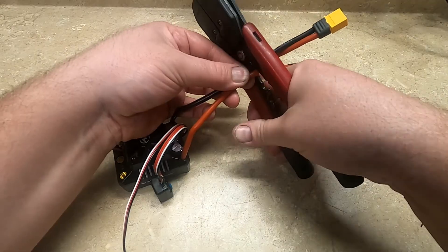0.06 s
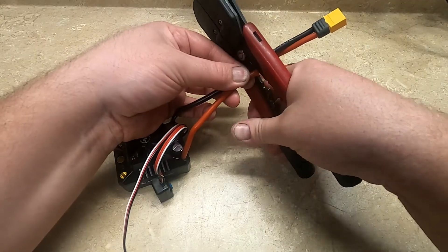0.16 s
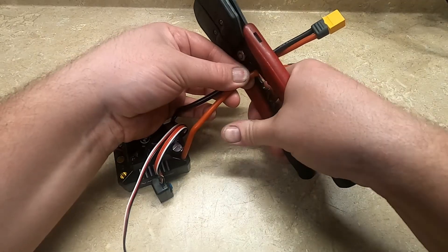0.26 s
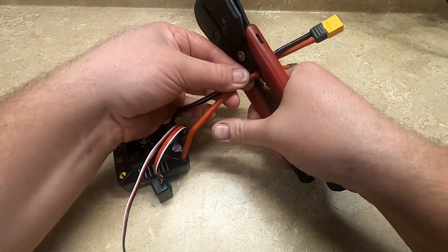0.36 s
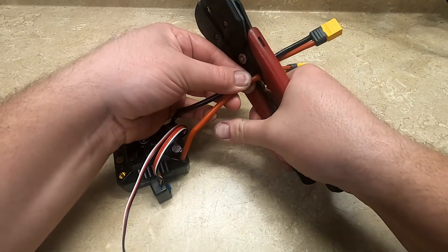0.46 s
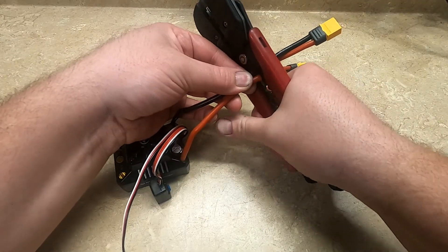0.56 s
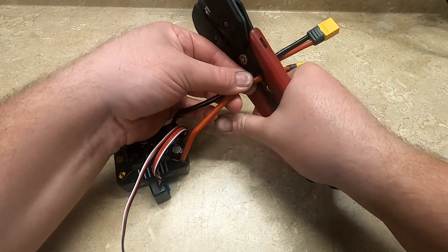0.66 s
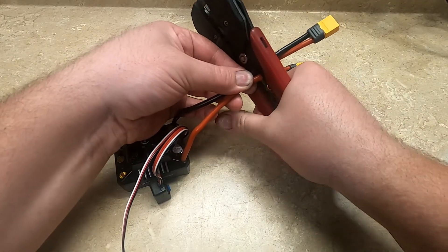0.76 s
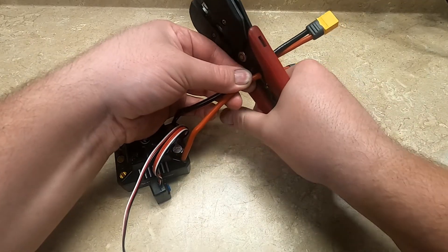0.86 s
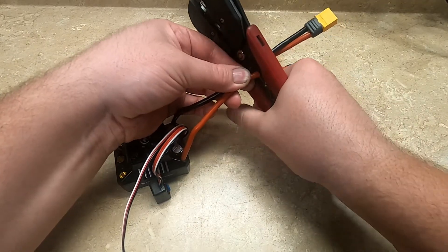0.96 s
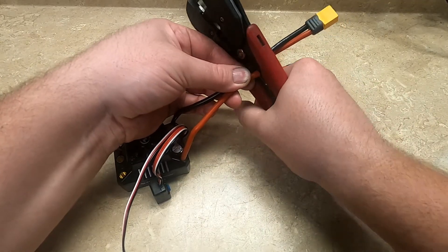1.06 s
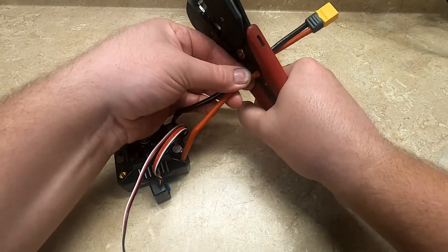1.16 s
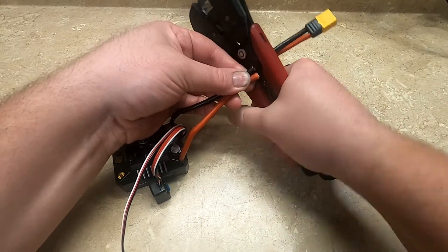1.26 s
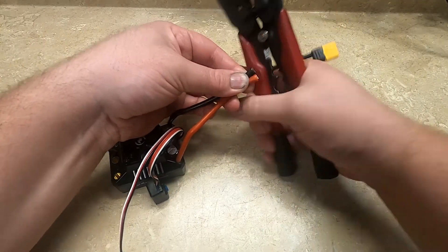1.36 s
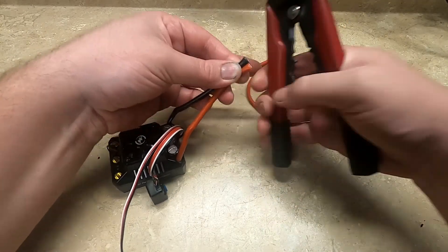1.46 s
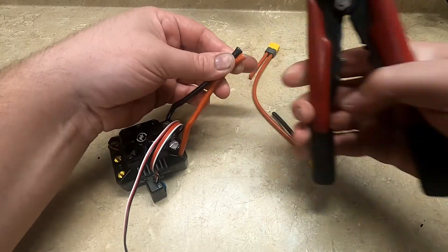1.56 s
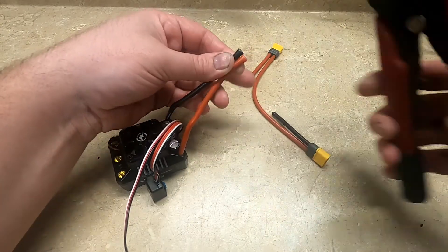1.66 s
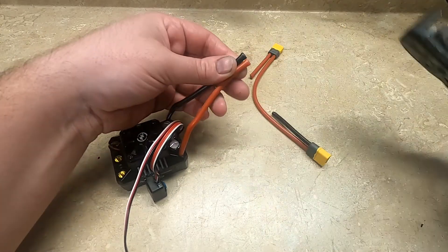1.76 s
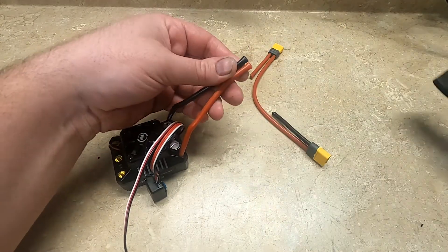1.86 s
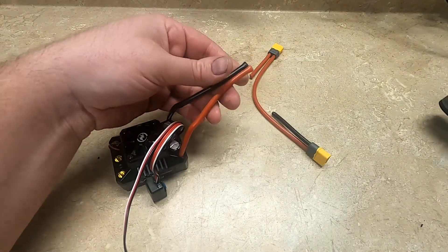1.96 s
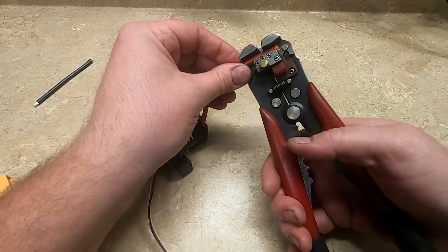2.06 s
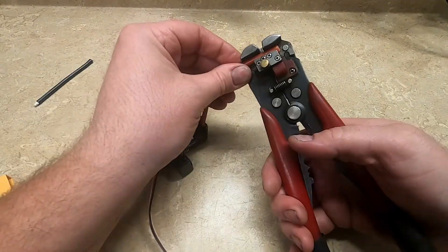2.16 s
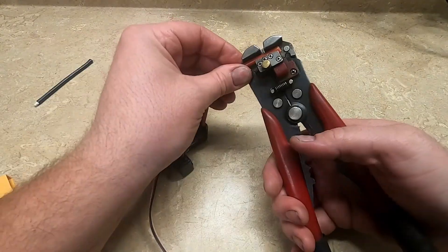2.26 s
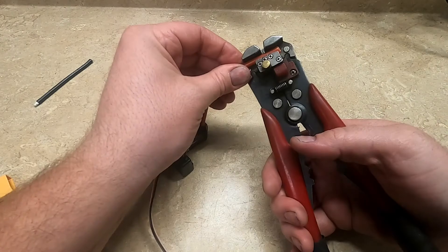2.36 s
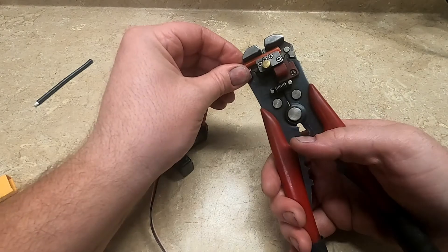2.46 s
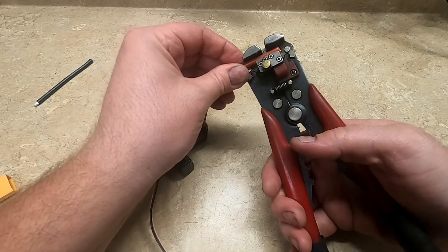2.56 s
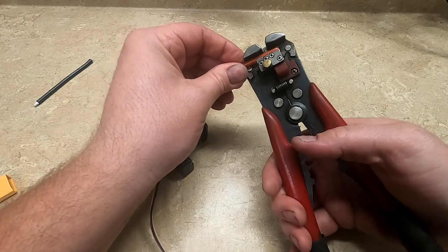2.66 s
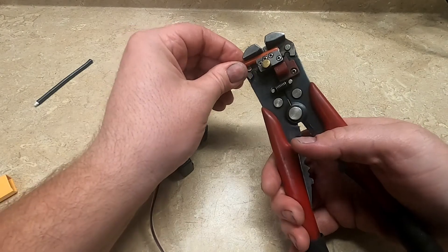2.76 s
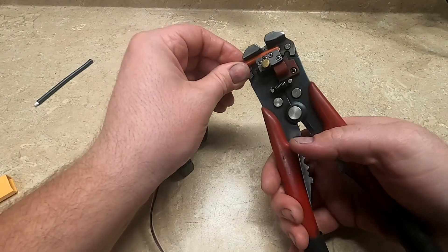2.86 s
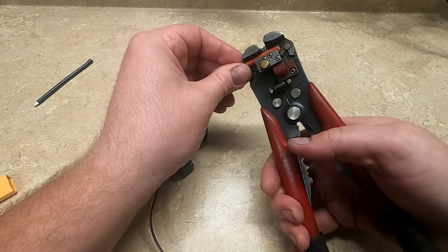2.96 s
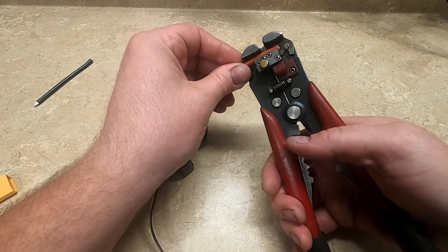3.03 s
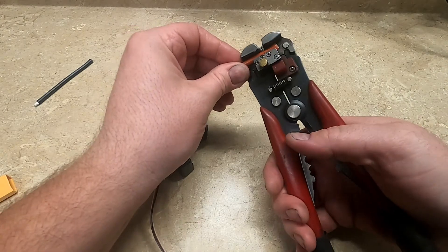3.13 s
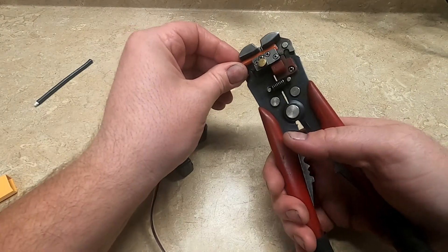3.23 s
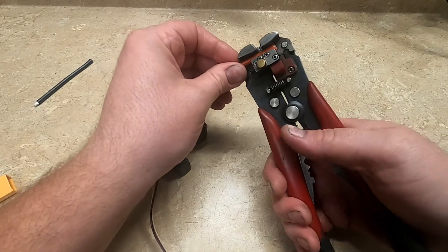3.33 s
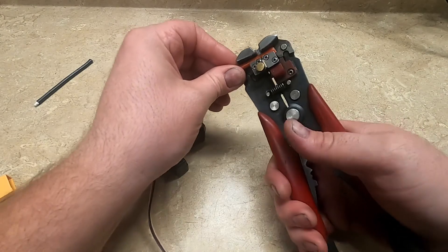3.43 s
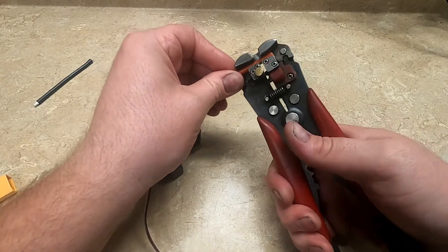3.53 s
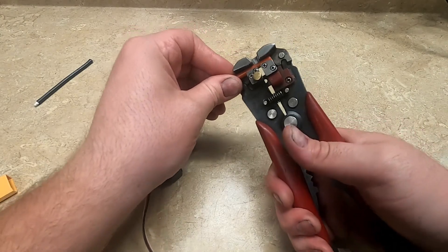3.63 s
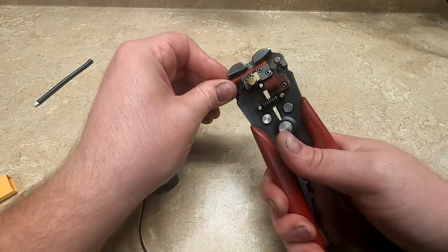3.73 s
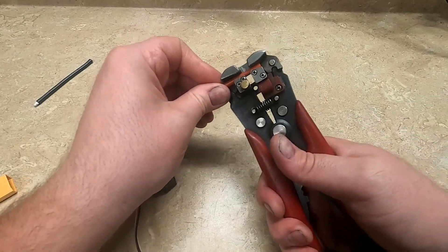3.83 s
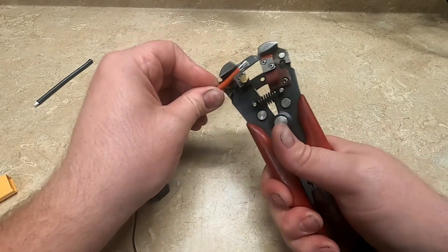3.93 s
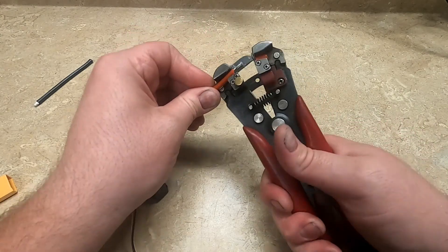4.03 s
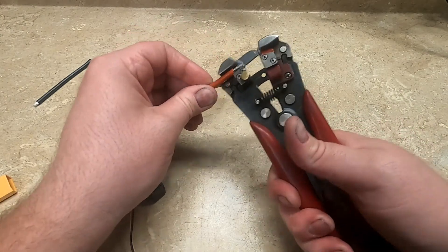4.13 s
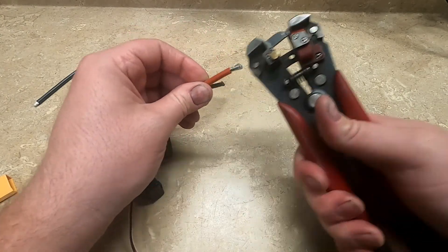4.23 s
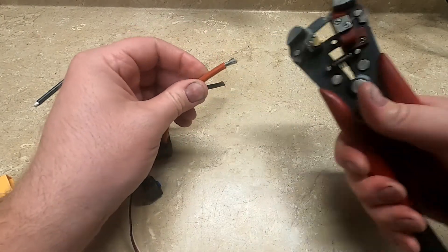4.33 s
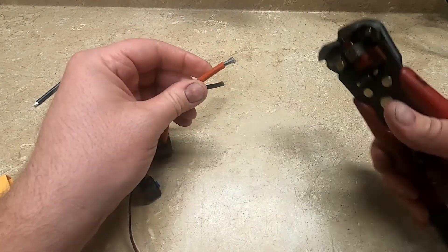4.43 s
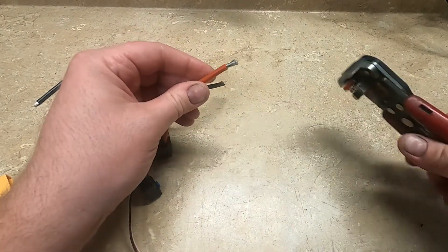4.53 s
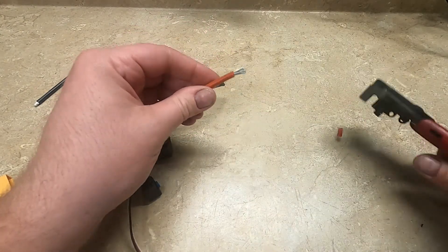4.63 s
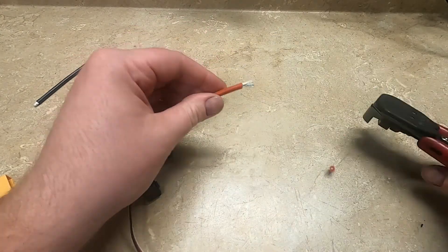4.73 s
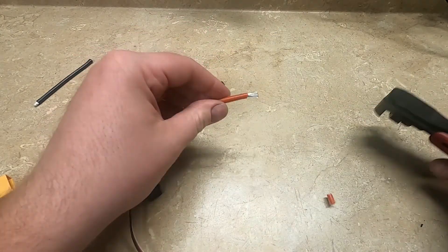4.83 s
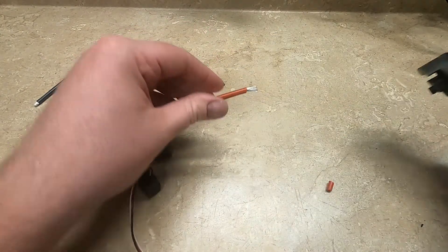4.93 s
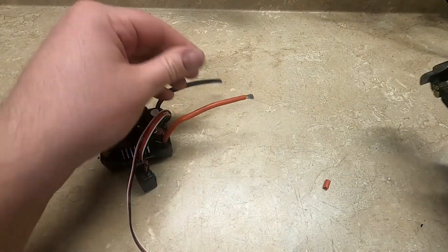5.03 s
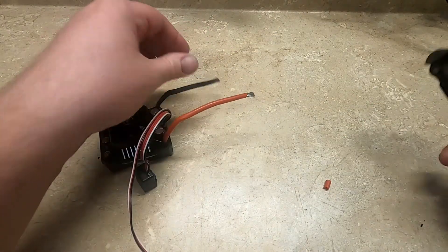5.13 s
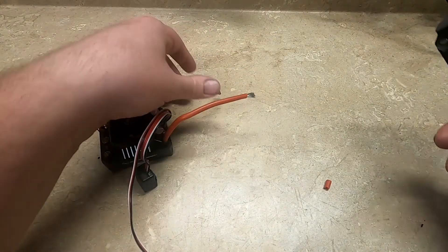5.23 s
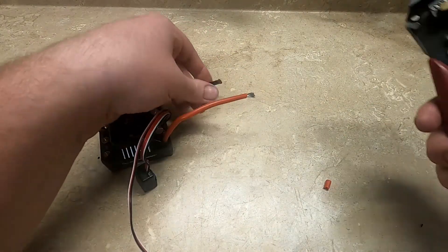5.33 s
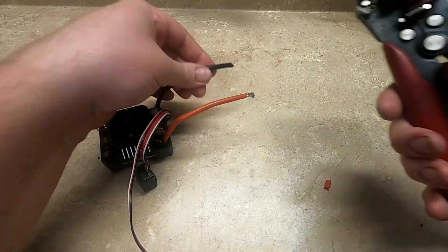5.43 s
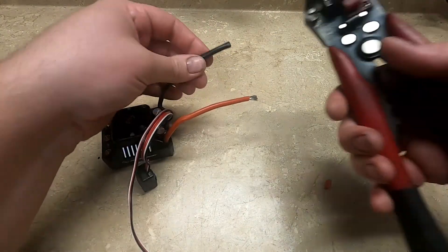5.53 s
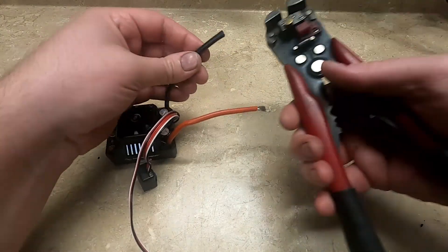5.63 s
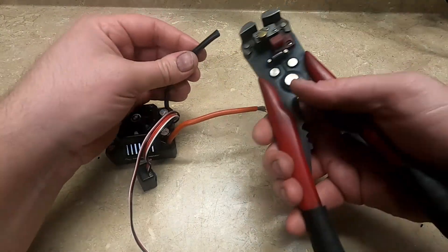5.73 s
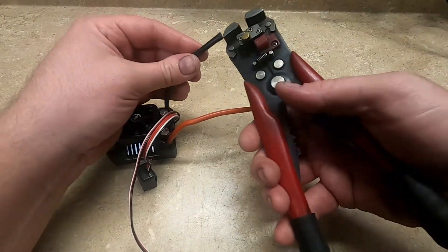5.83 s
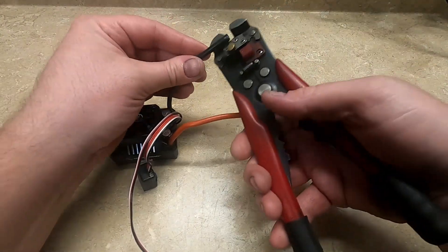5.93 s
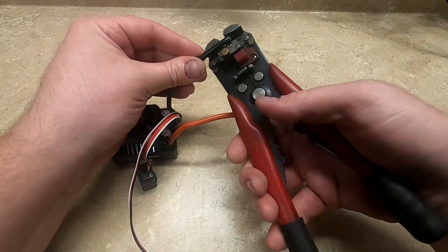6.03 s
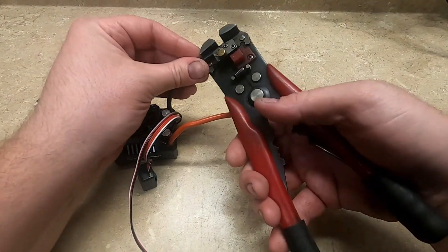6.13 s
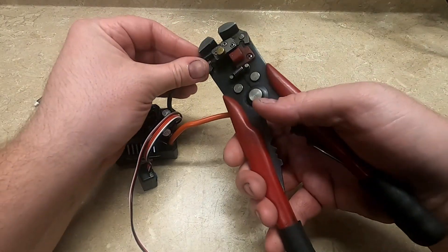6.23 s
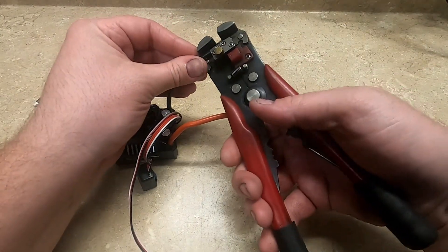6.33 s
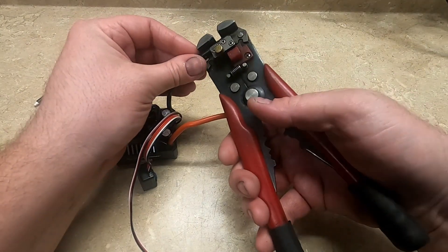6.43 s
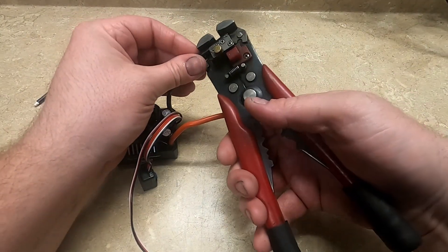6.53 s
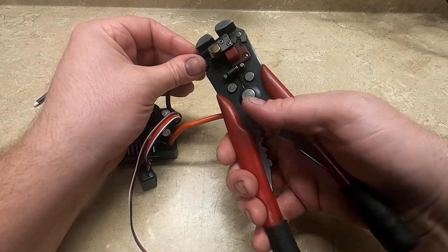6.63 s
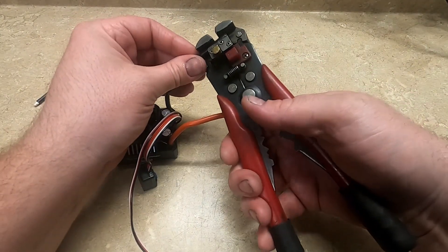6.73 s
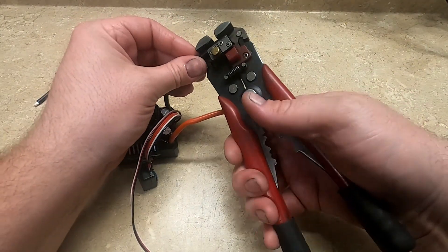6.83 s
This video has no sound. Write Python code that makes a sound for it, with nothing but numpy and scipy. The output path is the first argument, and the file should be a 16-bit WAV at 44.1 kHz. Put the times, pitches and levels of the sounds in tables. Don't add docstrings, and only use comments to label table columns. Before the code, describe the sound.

Wire cutting and stripping by hand, recorded close with a light indoor echo. Sparse metallic ticks and soft rustle lead to a hard snap, clattering jaws and a booming bump on the counter. A quick fade brings faint lining-up ticks, a low scraping pull, bright spring snaps, and finally light part knocks, a dull dragging thud and quiet handling.

```python
import sys
import numpy as np
from scipy import signal
from scipy.fft import rfft, irfft, next_fast_len
from scipy.io import wavfile
from scipy.ndimage import uniform_filter1d

SR = 44100
rng = np.random.default_rng(int(sys.argv[2]) if len(sys.argv) > 2 else 0)


def int16_out(signal):
    q = np.round(np.clip(np.atleast_2d(signal).T, -1, 1) * 32767)
    wavfile.write(sys.argv[1], SR, q.astype(np.int16))


def ratio(d):
    e = np.asarray(d, float) / 20
    return 10 ** e


N = 303849
LEAD_S = .02
RATTLE_RISE_S = .008

# f/Hz, width/Hz, level/dB
COUNTER_MODES = [(176.2, 8.9, -6.5), (261.3, 16, -5.5), (354.9, 53, 5), (462, 90, -9), (728, 91, -15),
                 (1017, 47, -20), (1226.3, 280, -18.5), (1446, 45, -21.5), (1824, 220, -22.5),
                 (2200, 940, -30.5), (3040, 1400, -42)]
# f/Hz, width/Hz, level/dB
MOUNT_MODES = [(45.4, 15, -4.5), (69.56, 39, -16), (98, 55, -1)]


def evened(x):
    return x / np.sqrt(np.mean(x ** 2) + 1e-20)


def read(points, hz):
    f, value = np.transpose(points)
    return np.interp(np.log(hz + 1), np.log(f + 1), value, left=value[0], right=value[-1])


def colour(x, points):
    size = next_fast_len(x.shape[-1])
    gain = ratio(read(points, np.fft.rfftfreq(size, 1 / SR)))
    return irfft(rfft(x, size) * gain, size)[..., :x.shape[-1]]


def add(mix, s, sound):
    part = mix[..., round(s * SR):][..., :sound.shape[-1]]
    part += sound[..., :part.shape[-1]]


def ring(modes, centre_hz=1000, narrow_db=0, tilt_db=0, detune=1, size=8192):
    hz, width, db = np.transpose(modes)[:, :, None]
    t = np.arange(size) / SR
    octaves = np.log2(hz / centre_hz)
    db = db - np.minimum(narrow_db * octaves ** 2, 22.) + tilt_db * octaves
    decay = np.exp(-np.pi * width * t)
    swell = 1 - decay ** 3
    return (ratio(db) * np.sqrt(width) * decay * swell * np.sin(2 * np.pi * hz * detune * t)).sum(0)


def chatter(noise, rise, fall, blow=0):
    t = np.arange(len(noise)) / SR - LEAD_S
    shape = np.exp(np.minimum(t / max(rise, 1e-4), -t / max(fall, 1e-4)))
    settling = ratio(-30) * np.exp(-t / .014) * (1 - t / t[-1]) * (t > 0) * noise
    first = blow * np.exp(-(t / 0.00016) ** 2)
    return np.tanh(noise ** 3 / 4) * shape + settling + first


def slips(per_s, spread_db, smooth):
    size = ratio(spread_db * np.minimum(rng.exponential(1, N), 4))
    size = size * (rng.random(N) < per_s / SR)
    return evened(size * rng.standard_normal(N)) + smooth * rng.standard_normal(N)


def gestures(s, rise, fall, db, hold=0):
    t = np.arange(0, N + 64, 64)[:, None] / SR
    before = (s - t) / np.maximum(rise, .003)
    after = (t - s - hold) / np.maximum(fall, .003)
    late = np.maximum(before, after)
    gain = np.sqrt(ratio(-2 * 20 * np.maximum(late, 0)) @ ratio(2 * np.array(db)))
    return np.array([np.interp(np.arange(N) / SR, t[:, 0], g) for g in gain.T])


def steel_bursts(rows):
    # f/Hz, width/Hz, level/dB
    steel_modes = [(1500, 500, -9), (1830, 390, -3), (2200, 150, -1.5), (2680, 170, -3), (3175, 390, -1),
                   (3530, 220, -5.5), (4130, 410, -2.5), (4674, 550, -2.5), (6040, 450, -0.5),
                   (6640, 230, -4.5), (6630, 570, -7.5), (8700, 360, -9), (8792, 320, -15.5),
                   (10800, 1300, -16), (12300, 230, -19.5), (13400, 2500, -22.5)]
    out = np.zeros(N)
    contacts = rng.standard_normal((len(rows), 3072))
    bend = rng.uniform(0.94, 1.05, (len(rows), len(steel_modes), 1))
    steep = signal.butter(3, 1100, "high", fs=SR, output="sos")
    for (s, db, hz, rise, fall, focus_db), c, b in zip(rows, contacts, bend):
        modes = steel_modes + [(hz, 0.1 * hz, -1)]
        detune = np.append(b, [[1]], axis=0)
        body = ring(modes, hz, narrow_db=focus_db, detune=detune, size=1024)
        sound = signal.fftconvolve(chatter(c, rise, fall), body)
        sound = signal.sosfilt(steep, sound)
        add(out, s - LEAD_S, ratio(db) * sound / abs(sound).max())
    return out


def clicks_and_snaps():
    # t/s, peak level/dB, brightest f/Hz, chatter/s, focus/(dB per octave squared)
    sudden = [(0.2793, -30, 5800, 0.0012, 5), (0.388, -45, 3000, 0.002, 2), (0.708, -54.5, 2300, 0.027, 3),
              (0.8513, -30, 1960, 0.0011, 10), (1.004, -44.5, 2350, 0.00067, 4.5),
              (1.161, -42, 5940, 0.0069, -4), (1.336, -44.5, 5980, 0.0023, 21),
              (1.393, -55, 3530, 0.0018, 4), (1.75, -37, 1680, 0.002, 4), (1.8076, -43, 2095, 0.0017, 2),
              (3.684, -40.5, 1608, 0.0016, 2.5), (4.131, -41, 2270, 0.0015, 27),
              (4.308, -46, 3770, 0.00196, 34), (4.38, -40, 3770, 0.0032, 7),
              (4.696, -47.5, 3410, 0.0025, -2), (5.192, -36.5, 2550, 0.0019, -0.5),
              (5.474, -47.5, 1870, 0.0023, 4.5), (6.58, -42.5, 2200, 0.0023, 13)]
    # t/s, peak level/dB, brightest f/Hz
    ticks = [(0.539, -52.5, 2980), (2.0925, -52.5, 2170), (2.4244, -57.5, 2740), (2.4381, -53.5, 3570),
             (2.811, -55.5, 1780), (2.9095, -53.5, 1585), (3.0017, -53, 2680), (3.0235, -54, 2665),
             (3.0688, -49, 3070), (3.157, -51, 2574), (3.2208, -59.5, 2690), (6.0586, -58, 2340),
             (6.2567, -55.5, 2004), (6.7452, -52, 1835), (6.782, -51.5, 1500), (6.817, -50.5, 1560),
             (6.85, -48.5, 1680), (6.874, -51, 2600)]
    # t/s, peak level/dB, brightest f/Hz, chatter/s, focus/(dB per octave squared)
    snaps = [(0.399, -33, 4650, 0.0054, 0), (1.1773, -27, 4420, 0.0022, 11.5),
             (1.1875, -6, 5980, 0.0016, 25.5), (1.186, -15.5, 2000, 0.0014, 20),
             (1.19, -22, 4800, 0.0052, 3.5), (1.432, -22, 4250, 0.0019, 6), (1.447, -21.5, 3840, 0.0032, 4),
             (1.469, -21, 2200, 0.0043, 1), (1.4891, -17, 5300, 0.002, 0.5),
             (1.5845, -14, 7130, 0.0015, 5.5), (1.59, -12, 3280, 0.0089, 7.5),
             (4.011, -25, 2430, 0.0049, 4), (4.018, -11.5, 4180, 0.00068, 4),
             (4.021, -12.5, 2430, 0.0031, 4.5), (4.453, -29.5, 2053, 0.0041, 3),
             (4.564, -24, 3530, 0.0018, 26), (4.567, -15, 4030, 0.0068, 5),
             (5.1465, -31, 3040, 0.0035, 5.5), (5.285, -41, 3190, 0.011, 15)]
    rows = [(s, db, hz, .0002, fall, focus_db) for s, db, hz, fall, focus_db in sudden]
    rows += [(s, db, hz, .0002, 0.0017, 5) for s, db, hz in ticks]
    rows += [(s, db, hz, 0.55 * fall, fall, focus_db) for s, db, hz, fall, focus_db in snaps]
    return steel_bursts(rows)


def further_clicks():
    # t/s, peak level/dB, brightest f/Hz, chatter/s, focus/(dB per octave squared)
    further = [(.356, -61, 3500, .002, 3), (.377, -49, 4000, .002, 1), (.569, -57.5, 5000, .0015, 7),
               (.667, -60, 6940, .0015, 2), (1.245, -38, 4800, 0.0036, 5), (1.356, -59, 4200, .002, 12),
               (1.3943, -43.5, 3530, 0.0015, 10), (1.4202, -37, 5530, 0.0018, 8),
               (1.5845, -17, 9300, 0.0027, 0.5), (1.589, -19, 8500, 0.002, 5), (1.5945, -16, 4900, 0.0016, 2),
               (1.722, -44, 5200, 0.0019, -7.5), (1.811, -51, 6760, 0.0018, 4), (3.893, -54, 6800, 0.0013, 1),
               (3.951, -51, 8200, 0.0016, -2.5), (3.964, -52, 5800, 0.0026, 10.5),
               (3.999, -39, 7340, .0015, 0), (4.0205, -20.5, 2220, 0.0017, 13.5),
               (4.022, -29, 12300, .005, 0.5), (4.406, -47, 5010, 0.0017, -1), (4.413, -52, 6510, 0.0018, -3),
               (4.46, -37.5, 4800, 0.009, -0.5), (4.493, -48, 2200, .002, 12), (4.565, -24, 10500, 0.0068, 4),
               (4.567, -20, 6260, 0.0056, 10.5), (4.572, -17, 4300, 0.0055, 3), (4.698, -56, 6500, .0015, -1),
               (5.281, -48, 2796, .002, 1.5)]
    return steel_bursts([(s, db, hz, .0002, fall, focus_db) for s, db, hz, fall, focus_db in further])


def ringing():
    # t/s, peak level/dB, f/Hz, time to rise 20 dB/s, time to fall 20 dB/s
    thuds = [(.09, -46, 334, -0.1, -0.8), (.354, -42, 164, .04, .04), (.375, -50, 330, .04, .04),
             (.395, -45.5, 171, .03, .04), (.492, -44, 252, .015, 1), (.5, -52, 486, .005, .04),
             (.54, -57.5, 708, .03, 0.15), (.627, -53.5, 678, .02, .03), (.714, -39, 350, .02, .025),
             (.745, -51, 351, .04, -0.2), (.79, -55, 310, .015, .04), (3.573, -33, 331, -0.2, 0.3),
             (3.628, -28.5, 351, .04, .02), (3.665, -34.5, 369, 0.4, .04), (3.78, -27.5, 357, -0.1, 0),
             (3.82, -28, 352, 0.1, -0.3), (3.857, -32, 365, 0.2, 0.5), (3.89, -33, 356, -0.1, .04),
             (3.953, -28, 363, 0.2, 0.5), (3.978, -28.5, 358.6, -0.1, 0.2), (4.001, -27.5, 361, -0.6, .008),
             (4.189, -38, 352, .04, 0.7), (4.569, -24.5, 4990, .008, -0.2), (4.571, -19, 3866, -0.7, .014),
             (4.572, -25, 3130, -0.2, .015), (5.178, -43.5, 304, .015, 1), (5.195, -37, 313, .02, .01),
             (5.205, -35.5, 299.5, -1.1, -0.5), (5.61, -36, 265, -0.5, .04), (5.624, -33.5, 345, -0.3, .04),
             (5.697, -25.5, 339, .04, .04), (5.735, -26, 343, -2.5, -0.2), (6.068, -44, 351, -0.3, -1)]
    # t/s, peak level/dB, f/Hz, time to fall 20 dB/s
    pings = [(1.187, -22, 280, .015), (1.187, -26, 550, .012), (1.2306, -32.5, 1260, -1),
             (1.2305, -29.5, 530, 1.5), (1.2305, -32, 668, -0.1), (1.2301, -35, 883, 2),
             (1.482, -17.5, 331, -0.4), (1.49, -22, 1690, -0.17), (1.599, -11, 1014, .012),
             (1.599, -14, 1750, 0.015), (3.41, -58, 1374, 0.2), (3.41, -62.5, 802, 3),
             (3.46, -43.5, 1398, 1), (3.46, -46.5, 752, -1), (3.462, -53, 2310, -1),
             (3.488, -44.5, 250, -0.1), (4.019, -24, 540, .012), (4.378, -60, 8960, -0.5),
             (4.452, -47, 9200, -0.3), (4.57, -23, 2620, .013), (4.57, -37, 4980, .06),
             (4.565, -36.5, 8780, .025), (4.567, -38, 9370, 1.8), (4.57, -38, 6280, -2),
             (5.06, -40, 1402, .025), (5.06, -42, 2007, .02), (5.059, -52, 3100, .02),
             (5.111, -50, 2710, .008), (5.148, -35, 2850, -0.1), (5.193, -56, 2310, -0.1),
             (5.281, -48, 2690, 0.1), (5.2874, -47, 2630, .012), (5.29, -49, 3290, .012)]
    rows = [(s, db, hz, max(rise, 4 / hz), max(fall, 4 / hz)) for s, db, hz, rise, fall in thuds]
    rows += [(s, db, hz, .0008, fall) for s, db, hz, fall in pings]
    waver = .03
    out = np.zeros(N)
    drift = np.cumsum(rng.standard_normal((len(rows), 8192)), 1)
    t = np.arange(8192) / SR - 4 * LEAD_S
    for (s, db, hz, rise, fall), d in zip(rows, drift):
        late = np.maximum(-t / np.clip(rise, 5e-4, .04), t / np.clip(fall, .003, .04))
        d = uniform_filter1d(d, size=round(2 * SR / hz))
        d = uniform_filter1d(d, size=round(SR / hz))
        phase = 2 * np.pi * hz * t + np.sqrt(2 * np.pi * waver * hz / SR) * d
        tone = ratio(db - 20 * late) * np.sin(phase)
        add(out, s - 4 * LEAD_S, tone * signal.windows.tukey(len(t), .5))
    return out


def knocks():
    # t/s, peak level/dB, hardness/(dB per octave), rocking level/dB, chatter/s
    blows = [(1.184, -17.5, 3, -3, 0.0008), (1.231, -28.5, 8, 6.5, 0.002), (1.482, -25, 2.5, 4, 0.0016),
             (1.599, -10, 13.5, -15, 0.01), (2.262, -49, 2.5, 0.5, .003), (3.3, -50, -5, 2, 0.0039),
             (3.459, -36, 17.5, -25.5, 0.0087), (4.016, -20.5, 1.5, -9.5, 0.0054),
             (4.615, -41, 8, -2, 0.006), (4.746, -35, 14.5, -26, 0.009), (4.854, -51.5, 11.5, -30.5, 0.005),
             (4.946, -44, 12, -17, 0.0077), (5.016, -53, 17, -25.5, 0.021),
             (5.062, -34.5, 14.5, -29.5, 0.0088), (5.484, -44, 11.5, -16.5, 0.0095),
             (6.064, -38.5, -4, -3, 0.0038)]
    out = np.zeros(N)
    contacts = rng.standard_normal((len(blows), 3072))
    rock = np.pad(ring(MOUNT_MODES), (round(LEAD_S * SR), 0))[:8192]
    rock = rock / abs(rock).max()
    for (s, db, hardness_db, rock_db, fall), c in zip(blows, contacts):
        hit = chatter(c, 0.00033, fall, blow=1.5)
        board = signal.fftconvolve(hit, ring(COUNTER_MODES, tilt_db=hardness_db))[:8192]
        add(out, s - LEAD_S, ratio(db) * (board / abs(board).max() + ratio(rock_db) * rock))
    return out


def dragging():
    # t/s, time to fall 20 dB/s, boom level/dB, sway level/dB, scrape level/dB
    jolts = np.array([(0, 0.0935, -36, -59, -47), (.075, 0.3, -56.5, -46.5, -81),
                      (0.701, 0.12, -55, -59.5, -74), (1.239, 0.1168, -45, -27, -51),
                      (1.599, 0.08, -27, -22, -30), (2.099, 0.4, -73.5, -82, -70.5),
                      (2.16, 0.07, -45.5, -53.5, -88), (2.27, 0, -58, -58, -81.5),
                      (3.47, 0.08, -65.5, -62, -52.5), (3.495, 0.5, -50, -52, -59),
                      (4.029, 0.074, -35, -23.5, -33), (4.079, 0.13, -38.5, -33.5, -50),
                      (4.188, 0.15, -48.5, -46.5, -58), (4.572, -0.01, -52, -63, -39),
                      (4.649, 0.08, -54, -39.5, -66), (4.745, -0.14, -41, -63.5, -47.5),
                      (4.851, 0, -68, -65, -57), (4.95, 0.9, -68, -78.5, -68.5),
                      (5.023, 0.08, -57.5, -73.5, -50), (5.069, -0.0036, -58.5, -52.5, -42.5),
                      (5.189, 0.16, -49.5, -56, -89), (5.485, 0.4, -57, -56, -71.5),
                      (6.27, -0.32, -52.5, -57.5, -86.5), (6.58, 12, -73, -80, -79.5)])
    # middle t/s, time to rise or fall 20 dB/s, boom, sway, scrape level/dB
    strokes = np.array([(0.386, 0.11, -60.5, -44, -66.5), (0.501, 0.04, -52, -62, -67),
                        (.62, 0.47, -59.5, -80.5, -66.5), (1.34, 0.34, -46.5, -45, -68),
                        (1.45, 0.0712, -34, -31.5, -42.5), (1.52, 0.08, -28.5, -34, -37.5),
                        (1.71, 0.14, -45, -41.5, -49.5), (2.6, 0.42, -68.5, -64, -86),
                        (2.88, 0.7, -86, -82, -80.5), (3.301, 0.08, -60, -57, -74.5),
                        (3.638, 0.04, -40, -46.5, -63), (3.782, 0.15, -43.5, -60.5, -42),
                        (3.969, 0.0635, -35, -53, -41), (4.42, 0.86, -66, -58.5, -73.5),
                        (5.139, 0.09, -58, -48.5, -55.5), (5.63, .04, -38, -70, -80),
                        (5.695, 0.0414, -24.5, -35.5, -42), (5.744, 0.0645, -34.5, -38.5, -55.5),
                        (6.05, 0.1447, -53.5, -46.5, -76)])
    # start t/s, hold/s, time to rise or fall 20 dB/s
    pull_s = (3.576, 0.397, 0.092)
    # boom, sway, scrape level/dB
    pull_db = [
        [-37.5, -60, -48.5],
    ]
    # boom, sway, scrape level/dB
    rest_db = [-77, -74, -90]
    # t/s, peak level/dB, time to rise 20 dB/s, time to fall 20 dB/s
    brushes = [(0, -65.5, -0.07, 0.1), (.41, -62, .02, .06), (.45, -71.5, 2, 0.9), (.85, -77.5, 0, 0.2),
               (1.16, -62.5, 0.12, 0.16), (1.37, -60.5, 0.37, 0.35), (1.46, -52, 0.06, 0.1658),
               (1.7, -53.5, 0.31, 0.1165), (1.85, -73, 0.8, 0.23), (2.09, -74, 0.03, -1.6),
               (2.93, -77, 0.7, 1.2), (3.47, -71, 0, 0), (3.6, -68.5, 0.14, 1.5), (4.0, -62, 0.2, -0.2),
               (4.39, -66.5, 0.07, -0.06), (4.56, -55, 0.25, -0.06), (5.18, -53, 0.09, 0.1157),
               (5.475, -71, 0.4, 0.38), (5.7, -73, 0.2, 0.35), (6.86, -65, 0.15, 3.5)]
    # t/s, peak level/dB, time to fall 20 dB/s
    rattles = [
        (1.192, -47.5, 0.1063),
        (1.215, -54.5, 0.24),
        (1.495, -42.5, 0.08),
        (1.605, -56, 0.0735),
        (2.43, -76.5, 0.2),
        (4.026, -49.5, 0.14),
        (4.456, -44, -0.03),
        (4.575, -43, 0.1131),
        (5.06, -66.5, 0.13),
    ]
    # f/Hz, level/(dB per Hz)
    scrape_spectrum = [(290, -24.5), (500, 0), (605, -11), (702, -5), (850, -11), (994, -6), (1280, -10.5),
                       (1430, -11.5), (4000, -35.5), (5200, -65.5), (8800, -120)]
    # f/Hz, level/(dB per Hz)
    rustle_spectrum = [(1180, -34), (2000, 1.5), (2560, -3.5), (3490, -1.5), (3770, -4), (5220, -6.5),
                       (6360, -7.5), (8360, -16.5), (12300, -24.5), (15500, -29.5)]

    jolt = gestures(jolts[:, 0], .014, jolts[:, 1], jolts[:, 2:])
    stroke = gestures(strokes[:, 0], strokes[:, 1], strokes[:, 1], strokes[:, 2:])
    pull = gestures(pull_s[0], pull_s[2], pull_s[2], pull_db, hold=pull_s[1])
    stroke = np.hypot(stroke, pull)
    boom, sway, scrape = np.sqrt(jolt ** 2 + stroke ** 2 + ratio(rest_db)[:, None] ** 2)
    deep = np.hypot(ratio(7) * jolt[0], ratio(1.5) * stroke[0]) / boom
    b = np.array(brushes + [(s, db, RATTLE_RISE_S, fall) for s, db, fall in rattles])
    rustle = np.hypot(gestures(b[:, 0], b[:, 2], b[:, 3], b[:, 1:2])[0], ratio(-88))

    rub = slips(1500, 0.29, .7)
    bands = (COUNTER_MODES[:2], COUNTER_MODES[2:4], COUNTER_MODES[4:])
    low, main, high = (evened(signal.oaconvolve(rub, ring(modes))[:N]) for modes in bands)
    out = (main + .5 * deep * low) / np.sqrt(1 + deep ** 2 / 4) * boom
    out += evened(signal.oaconvolve(slips(400, 1., 1.0), ring(MOUNT_MODES))[:N]) * sway
    grit = evened(colour(slips(2500, 1.8, 0.43), scrape_spectrum))
    out += evened(high + 1.2 * grit) * scrape
    return out + evened(colour(slips(2500, 1.9, 0.99), rustle_spectrum)) * rustle


def gliding():
    # middle t/s, peak level/dB, time to rise or fall 20 dB/s, f/Hz
    glides = [
        (0.123, -66.5, 0.42, 6480),
        (1.27, -60, 0.05, 4000),
        (1.52, -46, 0.1129, 1300),
        (1.56, -48, 0.17, 1750),
        (1.582, -46, -0.0063, 4800),
        (1.66, -56, 0.15, 1700),
        (1.66, -52, 0.14, 1300),
        (1.68, -56, 0.11, 4200),
        (5.09, -58, 0.15, 1370),
        (6.86, -56.5, 0.5, 288),
    ]
    # t/s, peak level/dB, time to fall 20 dB/s, f/Hz
    shudders = [
        (1.195, -55.5, 0.3, 6427),
        (1.232, -41, 0.1246, 462.3),
        (1.484, -32.5, 0.18, 255.1),
        (1.604, -31.5, 0.18, 251.8),
        (1.606, -49, 0.11, 4490),
        (4.59, -59.5, .2, 4910),
        (4.59, -58, 0.16, 3392),
    ]
    rows = [(s, db, fall, fall, hz) for s, db, fall, hz in glides]
    rows += [(s, db, RATTLE_RISE_S, fall, hz) for s, db, fall, hz in shudders]
    out = np.zeros(N)
    fine = slips(3000, 1.9, 1.5)
    for s, db, rise, fall, hz in rows:
        band = ring([(hz, .2 * hz, 0)], size=2048)
        tone = evened(signal.oaconvolve(fine, np.convolve(band, band))[:N])
        out += tone * gestures(s, rise, fall, [[db]])[0]
    return out


def room(x):
    # f/Hz, time to fall 60 dB/s
    decay_s = [(200, .25), (1000, .2), (4000, .16), (10000, .1)]
    taps = np.zeros((6, SR // 2))
    at = np.arange(160, SR // 2 - 20, 20)
    places = at + rng.integers(0, 20, (6, len(at)))
    np.put_along_axis(taps, places, rng.choice([-1., 1.], (6, len(at))), 1)
    hz, t, z = signal.stft(taps, SR, nperseg=128)
    tail = signal.istft(z * ratio(-60 * t / read(decay_s, hz)[:, None]), SR, nperseg=128)[1]
    pair = np.arange(6)[:, None] // 2
    turn = np.cos(2 * np.pi * (np.arange(N) / SR * 47 + pair / 3))
    wet = signal.fftconvolve(x * turn, tail / np.linalg.norm(tail[0]), axes=1)[:, :N]
    return wet.reshape(3, 2, N).sum(0)


def still_air():
    # f/Hz, level/(dB per Hz)
    air_spectrum = [(15, -26), (25, 2), (49, -1), (96, -13), (174, 7), (324, -14), (929, -35.5),
                    (1180, -17), (1640, -21), (1930, -17), (2890, -25.5), (4950, -39), (6310, -31.5),
                    (8270, -43), (15800, -50.5)]
    return ratio(-63) * evened(colour(rng.standard_normal((2, N)), air_spectrum))


def scene():
    steel = clicks_and_snaps()
    board = knocks() + dragging() + gliding()
    echo = room(ratio(-25) * steel + ratio(-10) * board)
    return steel + board + echo + still_air() + further_clicks() + ringing()


def top_cut(x):
    return signal.sosfilt(signal.butter(12, 16440, fs=SR, output="sos"), x)


def record(dry):
    # f/Hz, level/dB
    unlike = [(40, -27.5), (125, -9.5), (300, -13), (600, -3), (1500, -9.5), (5000, -1.5), (12000, 1)]
    # t/s, side level/dB
    width = [(0, 4), (1.75, -5), (2.1, -23.5), (2.15, -60), (2.9, -60.5), (3.1, -22), (3.5, -6),
             (4.2, -6.5), (4.55, -17), (4.75, -26.5), (5.55, -27), (5.7, -18), (6.0, -13), (6.89, -6)]
    t = np.arange(N) / SR
    mid, side = dry.sum(0) / 2, (dry[0] - dry[1]) / 2
    late = np.concatenate([np.zeros(7), mid[:-7]])
    lead = 1.1 * np.gradient(mid)
    side = colour(2.5 * side - 0.51 * late, unlike) - lead
    side = side * ratio(np.interp(t, *np.transpose(width)))
    fade = np.clip(abs(t - 2.122) / .025, .02, 1)
    both = np.array([mid + side, mid - side]) * fade
    both = signal.sosfilt(signal.butter(2, 32, "high", fs=SR, output="sos"), both)
    treble_cut = signal.firwin(511, 15750, window=("kaiser", 8), fs=SR)
    both = signal.oaconvolve(both, treble_cut[None], "same")
    return top_cut(both)


dry = scene()
out = record(dry)
int16_out(out)
```